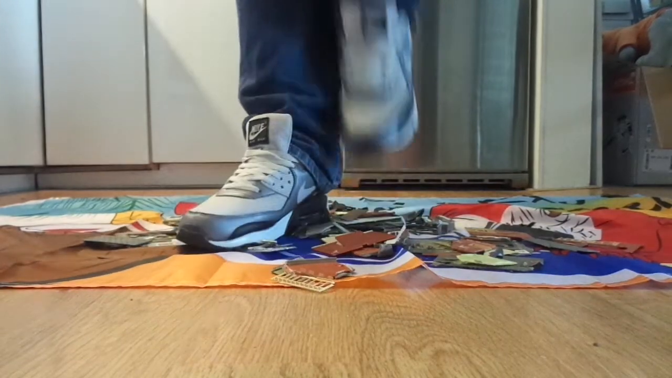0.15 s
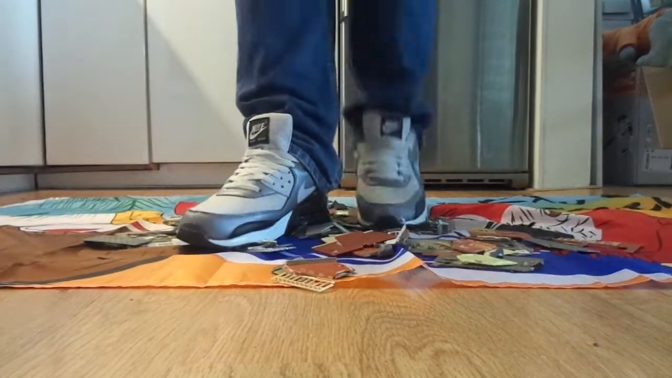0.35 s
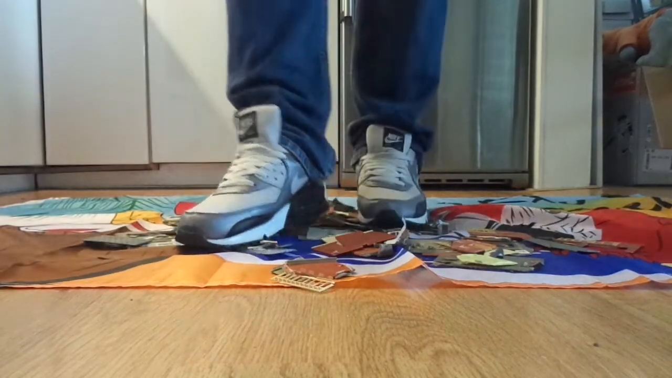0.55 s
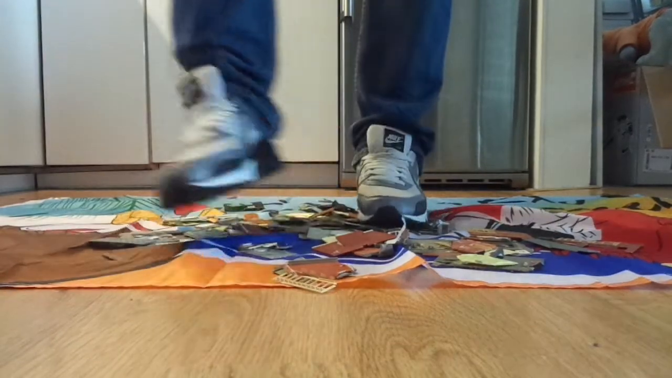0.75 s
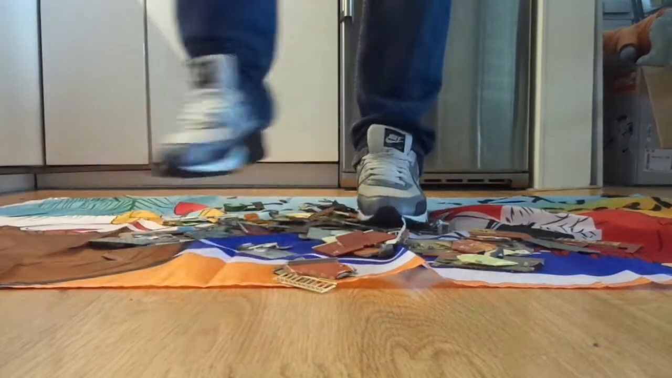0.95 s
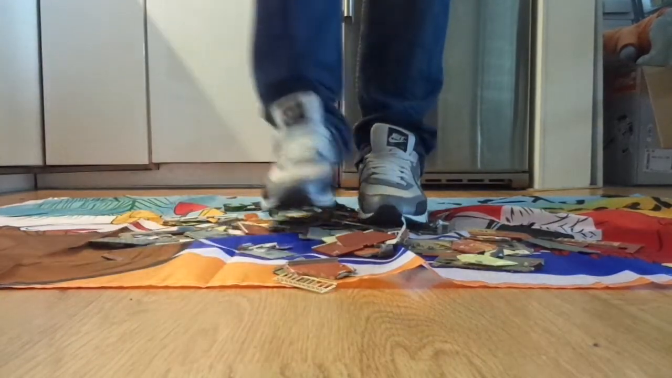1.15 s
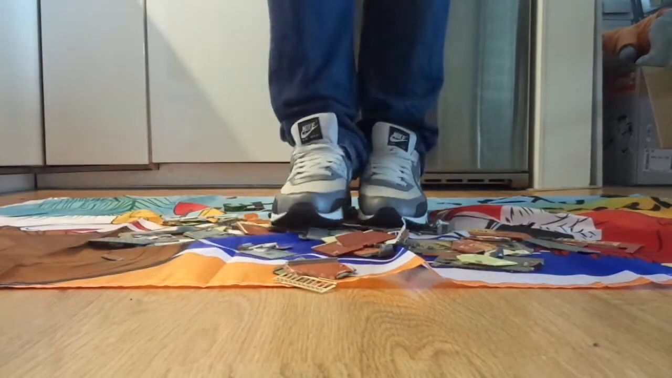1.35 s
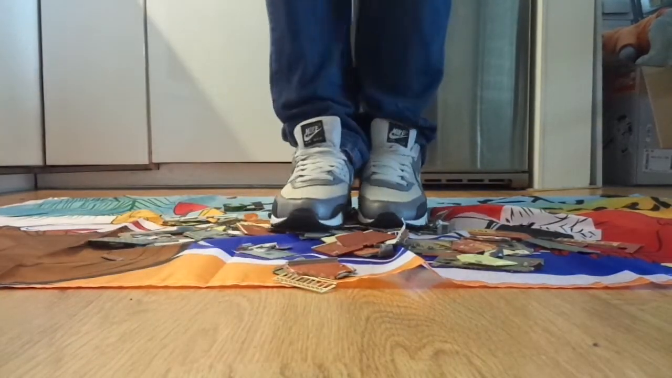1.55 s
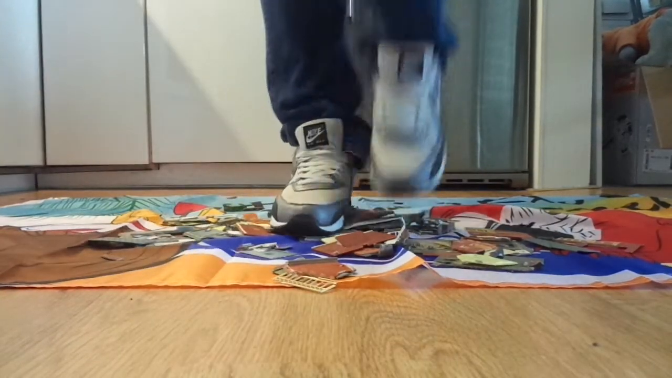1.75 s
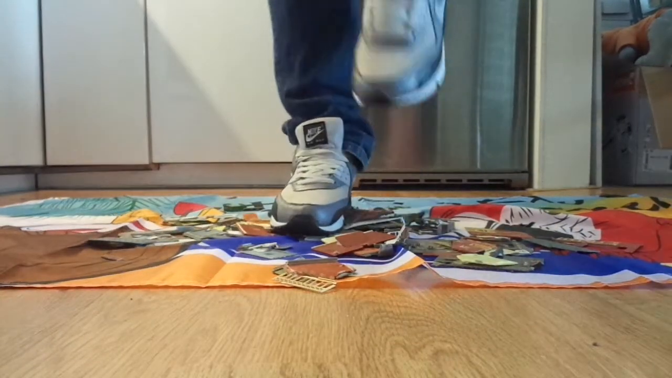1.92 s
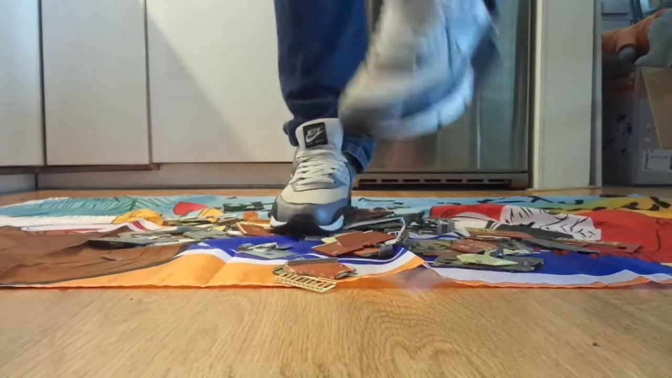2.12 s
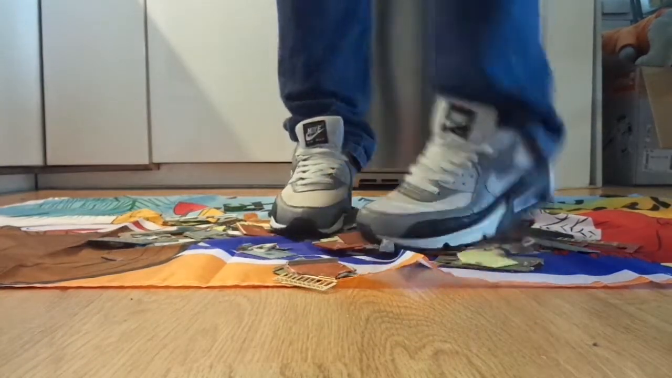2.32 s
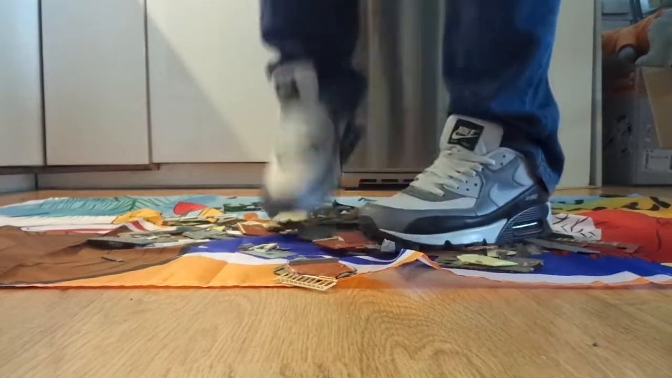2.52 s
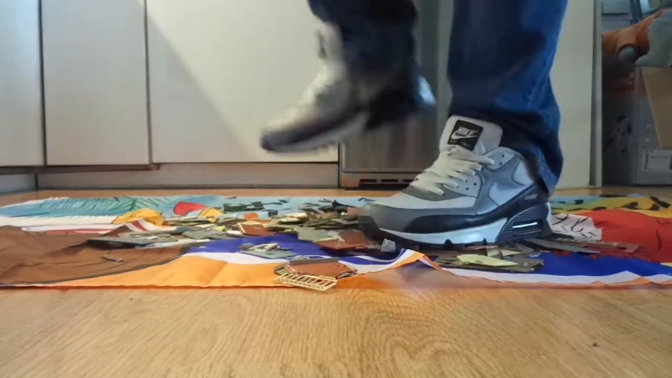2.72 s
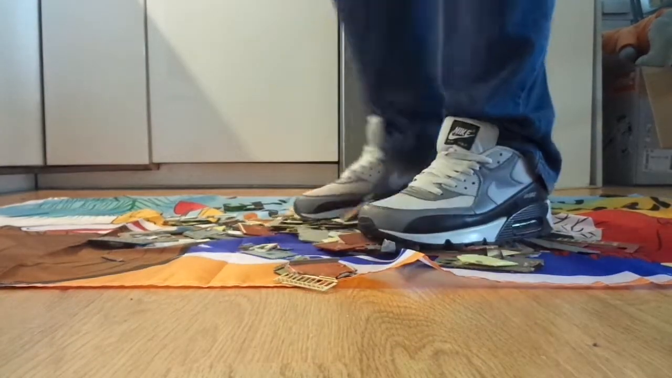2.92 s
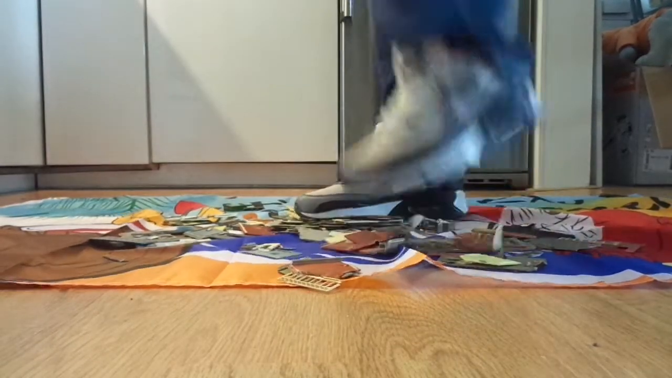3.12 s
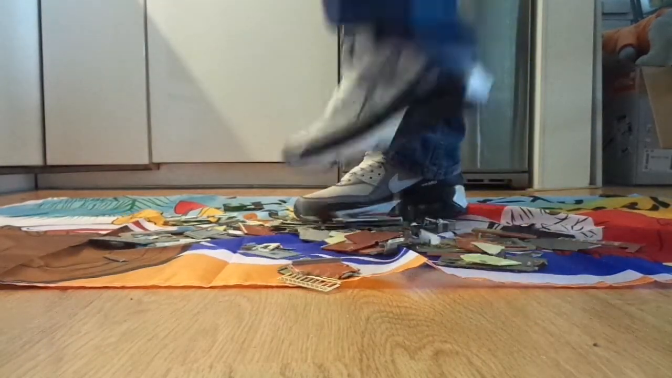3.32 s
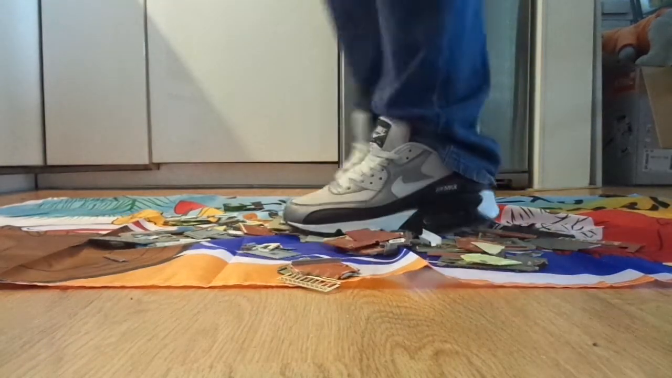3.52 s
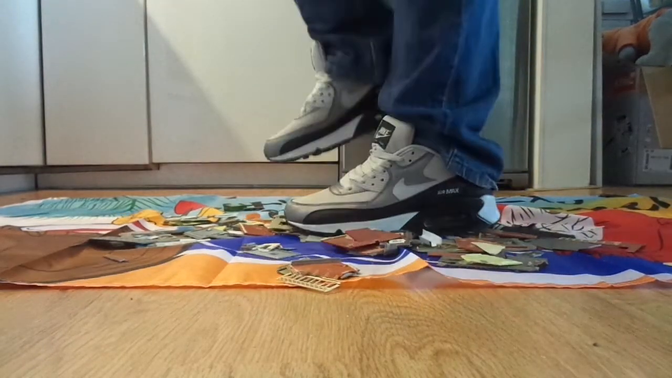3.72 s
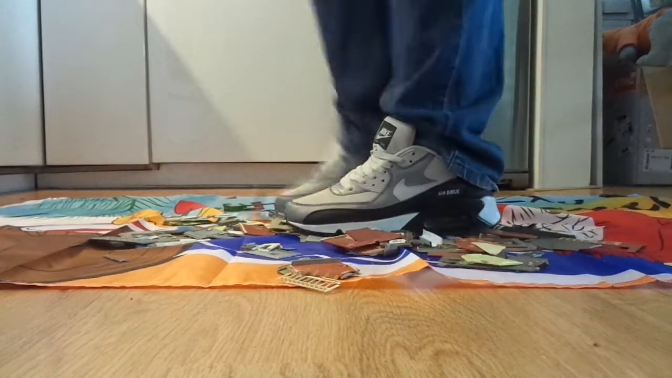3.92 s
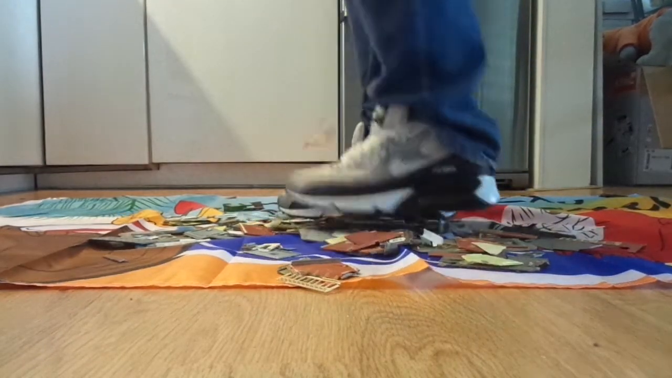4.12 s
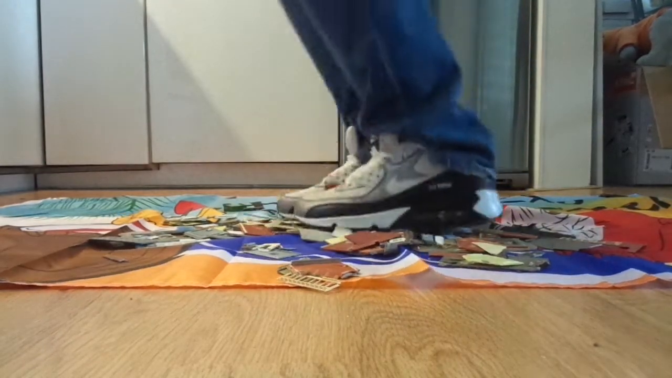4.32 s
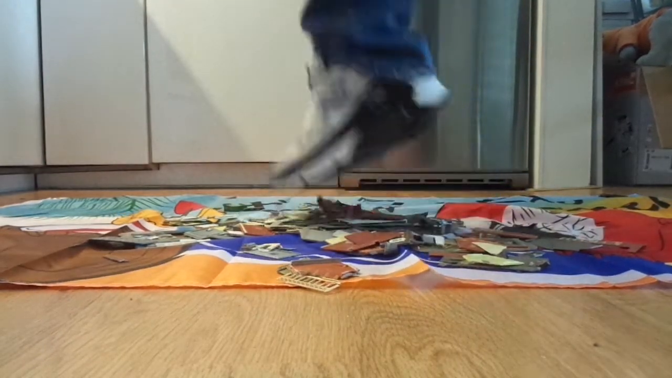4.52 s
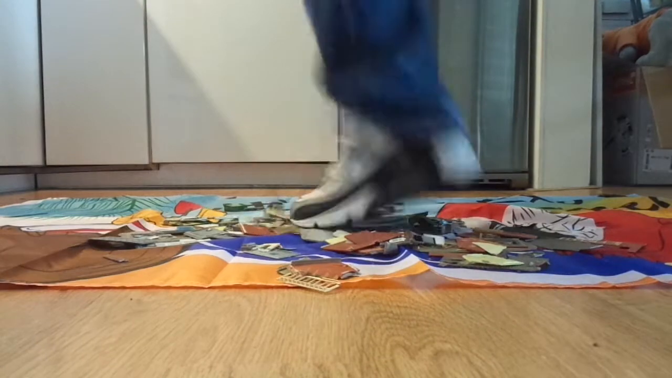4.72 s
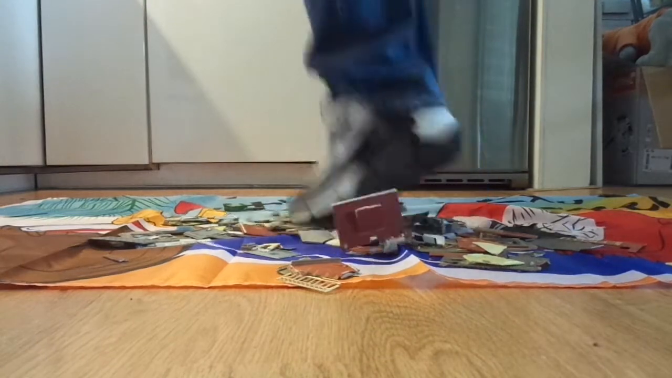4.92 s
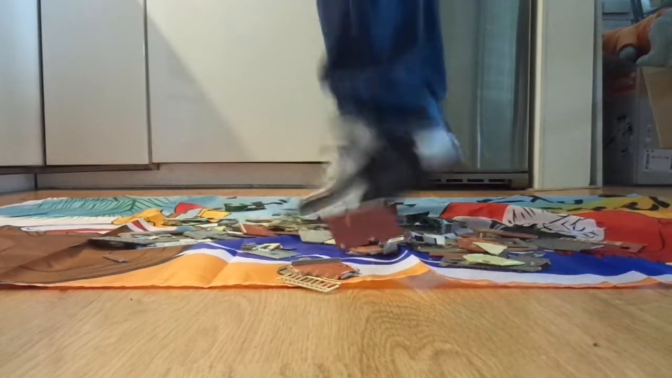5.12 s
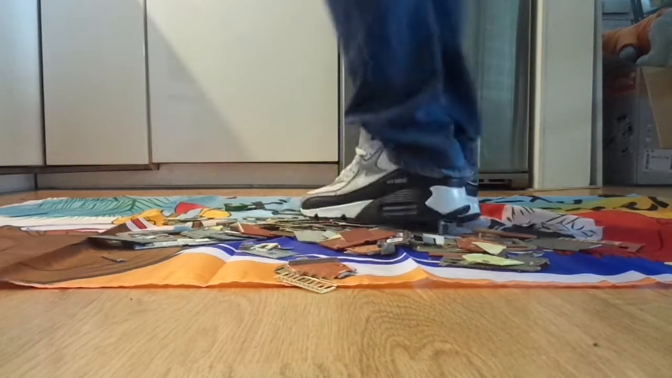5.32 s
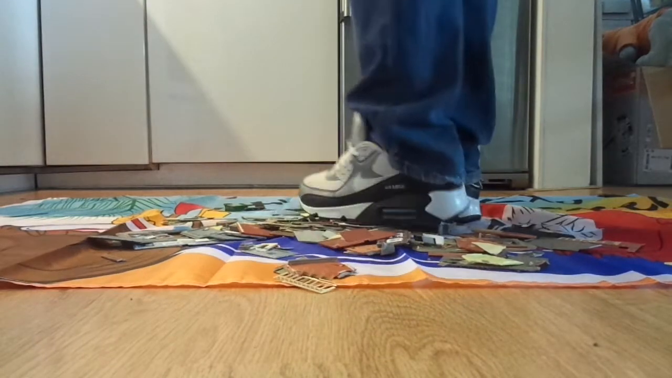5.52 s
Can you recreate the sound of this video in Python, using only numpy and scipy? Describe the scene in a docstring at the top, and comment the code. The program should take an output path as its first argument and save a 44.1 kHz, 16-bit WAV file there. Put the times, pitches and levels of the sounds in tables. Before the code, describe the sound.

Shoes stomp on small plastic model buildings indoors, walls snapping sharply and pieces crunching, with loose shards ticking in a lively, echoing room.

```python
"""Stamping on plastic model buildings

Trainers stamp on small plastic model buildings spread on a cloth over a wooden floor, close to a microphone.
Walls snap as short noise bursts, coloured by the size of each piece; parts collapse in showers of tiny clicks.
Loose rubble ticks and scrapes under the soles, single shards flick, and a heel thumps the boards.
A bare, lively room answers with echoes and a fading tail, over a faint hiss.
The loudest peaks are flattened, as in an overloaded microphone."""
import sys
import numpy as np
from scipy import signal
from scipy.fft import rfft, irfft
from scipy.io import wavfile

SR = 44100
rng = np.random.default_rng(int(sys.argv[2]) if len(sys.argv) > 2 else 0)


def wav_record(signal):
    """Record a signal, one row per channel, as 16-bit PCM in the file named by sys.argv[1]."""
    frames = np.transpose(np.atleast_2d(signal))
    bounded = np.clip(frames, -1, 1)
    # unit amplitude maps onto the largest positive 16-bit level
    quanta = np.round(bounded * 32767).astype(np.int16)
    wavfile.write(sys.argv[1], SR, quanta)


N = 249606  # length in samples
LEAD = SR // 2  # samples of run-up, so that the room can already be ringing at the start


def undb(db):
    """Turn decibels into a gain."""
    return 10 ** (np.asarray(db) / 20)


def unit(x):
    """Scale a sound to an energy of one."""
    return x / np.sqrt(np.sum(x ** 2) + 1e-18)


def along(hz, points):
    """Read a curve of (f/Hz, value) points, spacing the frequencies as the ear does, by ratio."""
    f, value = np.transpose(points)
    return np.interp(np.log(hz + 1), np.log(f), value)


def response(db_at, size=2048):
    """Make a filter whose gain in dB is db_at(Hz) and which never sounds before its input."""
    log_gain = np.log(undb(db_at(np.fft.rfftfreq(size, 1 / SR))))
    cepstrum = irfft(log_gain)
    # folding the second half onto the first puts the energy as early as possible
    cepstrum[1:size // 2] *= 2
    cepstrum[size // 2 + 1:] = 0
    return irfft(np.exp(rfft(cepstrum)))


def colour(x, points):
    """Give a sound a spectrum; the filter itself has an energy of one, so white noise keeps its power."""
    shape = unit(response(lambda hz: along(hz, points)))
    return signal.fftconvolve(x, shape)[:len(x)]


def add(track, s, x):
    """Mix x into the track at time s, in seconds."""
    start = max(int(s * SR) + LEAD, 0)
    part = x[:max(len(track) - start, 0)]
    track[start:start + len(part)] += part


def quiet_room():
    """The faint hiss of the quiet room is steady random noise with a soft top."""
    # colour of the hiss, before the overall level: f/Hz, level/dB
    hiss_colour = [(25, -29), (60, -16), (130, -7.5), (260, 0), (520, -3.5), (1200, -3.5), (2500, -15),
                   (6000, -20), (15000, -17.5)]
    return undb(-57) * colour(rng.standard_normal(N), hiss_colour)


def walls(build_s=0.0012, bass_db=-3.5, treble_db=-1):
    """Walls send back a few hard echoes and a diffuse tail; every call draws a new echo pattern."""
    # how long the tail takes to fall by 60 dB: f/Hz, time/s
    tail_times = [(150, 0.65), (350, 0.49), (1000, 0.65), (4500, 0.62), (14000, 0.66)]
    # first echoes from cupboard doors and walls, delays varied a little below: delay/s, level/dB
    first_echoes = [(.0042, -31), (.0135, -26), (.0152, -16), (.0215, -23)]
    size = 32768
    t = np.arange(size) / SR
    hz = np.fft.rfftfreq(size, 1 / SR)
    tilt_db = along(hz, [(200, bass_db), (1500, 0), (10000, treble_db)])
    noise = rfft(rng.standard_normal(size)) * undb(tilt_db)
    centres, t60s = np.transpose(tail_times)
    tail = 0
    # overlapping bands, each fading at its own pace
    for share, t60 in zip(np.eye(len(centres)), t60s):
        band = irfft(noise * along(hz, np.c_[centres, share]))
        tail = tail + band * np.exp(-np.log(1000) * t / t60)
    echo = unit(tail * (1 - np.exp(-t / build_s)))
    for delay, db in first_echoes:
        echo[int(delay * rng.uniform(.93, 1.07) * SR)] += undb(db)
    return echo


def room(x, wet_db):
    """Add to the direct sound what the walls send back."""
    paths = undb(wet_db) * walls()
    paths[0] += 1
    return signal.fftconvolve(x, paths)


def fractures(count, per_s, spread_db, grit, shard_q=4):
    """Tiny breaks give clicks of very uneven size; some ring at one of ten shard pitches, over fine grit."""
    def clicks(rate):
        """Place clicks at random moments, about rate of them per second, pushing either way."""
        hit = np.flatnonzero(rng.random(count) < rate / SR)
        size_db = spread_db * np.minimum(rng.exponential(size=len(hit)), np.pi)
        train = np.zeros(count)
        train[hit] = undb(size_db) * rng.choice([-1, 1], len(hit))
        return train

    shards = 0
    for hz in np.geomspace(500, 13000, 10):
        hz = min(hz * 2 ** rng.uniform(-0.34, 0.27), SR / 3)
        ring = signal.iirpeak(hz, shard_q, fs=SR)
        shards = shards + signal.lfilter(*ring, clicks(per_s / 2))
    dry_clicks = 1.15 * unit(clicks(per_s))
    dust = grit * unit(rng.standard_normal(count))
    return unit(unit(shards) + dry_clicks + dust) * np.sqrt(count)


def piece(push, bass_db, treble_db, ring_hz, ring_db, ring_width):
    """A plastic piece sounds the push: broad plate colour, tilted by its size, with one stronger resonance."""
    # colour of breaking plastic: f/Hz, level/dB
    plastic = [(35, -41), (60, -18), (190, -15.5), (295, -4.5), (458, -4.5), (564, -1.5), (648, -4),
               (762, -1), (1830, -4), (2420, -2.5), (4110, -6.5), (9020, -15.5), (12200, -21), (15000, -31)]
    tilt = [(100, -5), (250, bass_db), (480, bass_db), (900, -1), (1700, 0.5), (4500, treble_db)]

    def own_db(hz):
        """Add the tilt and a smooth peak at the ring to the plate colour."""
        off_ring = (hz - ring_hz) / (ring_width * ring_hz)
        return along(hz, plastic) + along(hz, tilt) + ring_db / (1 + off_ring ** 2)

    plain = response(lambda hz: along(hz, plastic))
    return signal.fftconvolve(push, response(own_db)) / np.sqrt(np.sum(plain ** 2))


def bass_of(ring_hz, middle_db, db_per_octave):
    """A large piece rings lower and has more bass than a small one; 1020 Hz is a middle-sized piece."""
    return middle_db - db_per_octave * np.log2(ring_hz / 1020)


def split(decay_s, wet_db, opening_s=0.00039, ripple=0.68, shade_db=-3):
    """Plastic gives way over a few milliseconds; the room gathers the snap from all sides."""
    t = np.arange(1024) / SR
    fade = np.exp(-t / decay_s) * (1 - np.exp(-t / opening_s))
    burst = rfft(fade * rng.standard_normal(len(t)))
    # the sole shades the treble on the direct path
    shade = undb(along(np.fft.rfftfreq(len(t), 1 / SR), [(4000, 0), (11000, shade_db)]))
    # every split favours its own few frequencies; a ripple below 1 evens them out somewhat
    direct = irfft(shade * np.abs(burst) ** ripple * np.exp(1j * np.angle(burst)))
    push = undb(wet_db) * walls()
    push[:len(t)] += unit(np.sqrt(fade) * direct) * np.sqrt(np.mean(shade ** 2))
    return push * np.sqrt(.005 * SR)  # levels count as an average over 5 ms


def rubble():
    """Loose shards tick and scrape between sole and cloth, swelling and fading with each shift of weight."""
    # pieces shifting as a foot lifts or the weight moves, before the trim: middle t/s, length/s, level/dB
    shifts = [(1.58, 0.21, -46.5), (2.552, 0.15, -35.5), (2.971, 0.13, -34.5), (3.663, 0.08, -37),
              (3.82, 0.21, -47.5), (4.146, 0.24, -38), (4.544, 0.18, -34.5), (4.995, 0.27, -35),
              (5.66, 0.18, -43.5)]
    # colour of sliding pieces: f/Hz, level/dB
    sliding = [(59, -84), (100, -39), (196, -34), (279, -4.5), (399, -2), (524, -15.5), (582, -10),
               (942, -6.5), (2180, -1.5), (10300, -14.5), (15000, -29)]
    standing_db, trim_db = -63.5, -1.5  # creaking under a standing foot; trim of the whole layer
    t = (np.arange(LEAD + N) - LEAD) / SR
    motion = undb(standing_db)
    for s, length, db in shifts:
        motion = motion + undb(db) * np.exp(-(2 * (t - s) / length) ** 2)
    shards = fractures(LEAD + N, per_s=300, spread_db=5, grit=.7, shard_q=7)
    scrape = colour(shards * motion * undb(trim_db), sliding)
    return room(scrape, wet_db=0.5)[:LEAD + N]


def thumps(contact_s=0.00058, rebound_s=0.025):
    """A soft, one-sided push on the boards, which then spring slowly back."""
    # the heel drops through and thumps the floor: t/s, height of the push/dB
    heel_drops = [(0.3745, -22), (3.312, -34), (4.744, -22), (4.7865, -39)]
    out = np.zeros(LEAD + N)
    t = np.arange(SR // 8) / SR
    push = t * np.exp(-t / contact_s)
    rebound = t * np.exp(-t / rebound_s)
    # the rebound undoes the push exactly
    blow = (push - rebound * push.sum() / rebound.sum()) / push.max()
    for s, db in heel_drops:
        add(out, s, undb(db) * blow)
    return out


def ticks(middle_hz=4760, scatter_octaves=0.05):
    """Small shards of much the same size flick against each other and click with one high, short ring."""
    # flicks, with the level over 5 ms before the piece colours it: t/s, level/dB
    flicks = [(1.442, -42), (1.5436, -39.5), (1.5914, -41.5), (3.016, -41), (4.164, -30), (4.452, -25),
              (4.9276, -25), (5.4844, -33), (5.625, -39.5)]
    out = np.zeros(LEAD + N)
    for s, db in flicks:
        push = split(decay_s=0.002, wet_db=-2.5)
        ring_hz = middle_hz * 2 ** (scatter_octaves * rng.standard_normal())
        click = piece(push, bass_db=-1.5, treble_db=-0.5, ring_hz=ring_hz, ring_db=14.5, ring_width=0.11)
        add(out, s, undb(db) * click)
    return out


def crunches(trim_db=-1, rise_share=0.17):
    """The sole lands and many thin parts fail together, fading as the heap flattens; the remains crumble on."""
    # showers under a sole, levels before the trim:
    # t/s, starting level/dB, ring of the piece f/Hz, treble/dB, decay time/s
    showers = [(-0.12, -21, 2400, 0.5, 0.013), (0.293, -21.5, 700, 1.5, 0.037),
               (0.387, -9, 2800, -3, 0.011), (0.468, -13.5, 800, -1.5, 0.01),
               (0.69, -39.5, 400, 4.5, 0.048), (1.2, -39, 596, 8, 0.017), (1.212, -31.5, 500, 8, 0.019),
               (1.221, -22, 870, -8.5, 0.011), (1.643, -21.5, 940, -28, 0.016),
               (2.254, -43.5, 2800, -2, 0.0091), (2.276, -23, 510, 6, 0.017),
               (2.321, -14.5, 565, -1, 0.0048), (2.378, -25, 1900, -10, 0.035),
               (2.865, -21.5, 380, 2.5, 0.039), (3.122, -36, 380, 5, 0.043), (3.33, -16, 2670, 2, 0.065),
               (3.436, -11.5, 569, -1.5, 0.009), (3.929, -19.5, 605, -2, 0.023),
               (4.222, -20.5, 525, 0, 0.022), (4.234, -17.5, 670, -1.5, 0.009),
               (4.706, -24.5, 450, 7, 0.0093), (4.718, -17, 700, 4, 0.014), (4.739, -11, 2000, 1, 0.012),
               (4.797, -24.5, 770, -1, 0.039), (4.89, -20.5, 1800, -3, 0.021), (5.12, -27, 2400, -6, 0.015),
               (5.132, -16.5, 280, 6, 0.009), (5.148, -12.5, 1010, 2, 0.0092), (5.18, -22, 890, 3.5, 0.043)]
    crumble_db, crumble_s = -14, 0.054  # a thinner, slower crumbling in every crunch
    out = np.zeros(LEAD + N)
    t = np.arange(SR // 4) / SR

    def crush(decay, grains):
        """A slow crush also builds slowly."""
        load = np.exp(-t / decay) * (1 - np.exp(-t / (rise_share * decay)))
        return unit(load * grains) * np.sqrt(decay * SR / 2)

    for s, db, ring_hz, treble_db, decay in showers:
        push = crush(decay, fractures(len(t), per_s=700, spread_db=3, grit=0.25))
        remains = fractures(len(t), per_s=160, spread_db=5.5, grit=0.11)
        push += undb(crumble_db) * crush(crumble_s, remains)
        bass_db = bass_of(ring_hz, middle_db=-0.5, db_per_octave=4.5)
        shower = piece(push, bass_db, treble_db, ring_hz, ring_db=4, ring_width=.14)
        add(out, s, undb(db + trim_db) * room(shower, wet_db=-2.5))
    return out


def cracks():
    """A wall snaps in a burst of a few milliseconds; its size sets the ring and the bass."""
    # walls snapping, with the level over 5 ms before the piece colours it:
    # t/s, level/dB, ring of the piece f/Hz, ring/dB, treble/dB, room share/dB
    snaps = [(0.376, -5, 1175, 8, -1, -3.5), (0.42, -12.5, 400, 3.5, 6, -2.5),
             (0.4623, -13.5, 575, 14, 6, -9.5), (1.6312, -15, 1100, 6.5, -10, 1),
             (1.739, -29, 4500, 2.5, 15, -4), (1.92, -28, 2870, 0, 9, 0.5),
             (2.283, -20, 530, 13, 11.5, 0.5), (2.3176, -16, 537, 5, 0.5, 2),
             (2.3734, -14, 1900, 5, 2, -1.5), (3.3136, -5.5, 4000, 5, 3.5, -3),
             (3.3174, -9.5, 2300, 8, -1, -3), (3.4602, -18.5, 4770, 7.5, -0.5, 2),
             (4.2827, -11, 780, 11.5, 3, -3), (4.2959, -12, 1510, 13, 1.5, -4.5),
             (4.3904, -16.5, 3880, 3.5, 5.5, -4.5), (4.7121, -9, 1100, 2, 0, 3),
             (4.716, -10.5, 1494, 4, -3, 2), (4.7472, -7, 1280, 6, -10, -1),
             (4.7862, -7.5, 733, 8.5, -4.5, -2.5), (4.792, -11.5, 700, 3.5, -3, -2),
             (4.8315, -17, 1790, 7, -11, -15), (4.8751, -14.5, 1820, 5.5, -4, -5.5),
             (4.884, -14.5, 1920, 10, -2.5, -22), (5.1364, -13, 584, 6, 1.5, 0),
             (5.2121, -11.5, 546, 3, 1.5, -5.5), (5.497, -29.5, 614, 8, 2, 1)]
    out = np.zeros(LEAD + N)
    for s, db, ring_hz, ring_db, treble_db, wet_db in snaps:
        push = split(decay_s=0.0028, wet_db=wet_db)
        bass_db = bass_of(ring_hz, middle_db=-2.5, db_per_octave=5)
        snap = piece(push, bass_db, treble_db, ring_hz, ring_db, ring_width=0.17)
        add(out, s, undb(db) * snap)
    return out


def scene():
    """The steps reach both channels almost alike, over a faint room hiss."""
    # level of the faint left-right difference: f/Hz, level/dB
    side_colour = [(80, -26), (250, -33), (800, -53.5), (2500, -56), (6000, -41.5), (12000, -25.5)]
    steps = (cracks() + ticks() + crunches() + rubble() + thumps())[LEAD:]
    mid = steps + quiet_room()
    # a faint left-right difference, shaped from the first 25 ms of a wall echo, with opposite signs left and
    # right
    short_echo = unit(walls()[:SR // 40])
    side_echo = signal.fftconvolve(short_echo, response(lambda hz: along(hz, side_colour)))
    side = signal.fftconvolve(mid, side_echo)[:N]
    return np.array([mid + side, mid - side])


def record(dry):
    """Peaks beyond full scale are flattened; then everything above about 15 kHz is cut."""
    clipped = np.clip(dry, -1, 1)
    top_cut = signal.ellip(10, .1, 70, 15100, fs=SR, output="sos")
    return signal.sosfilt(top_cut, clipped)


dry = scene()
out = record(dry)
wav_record(out)
```